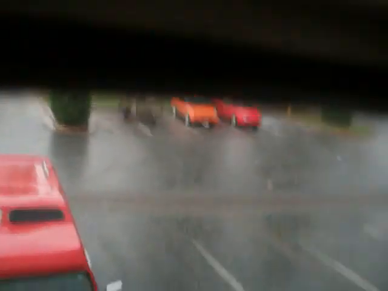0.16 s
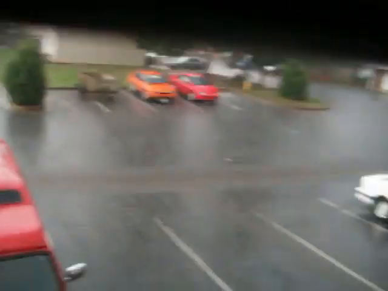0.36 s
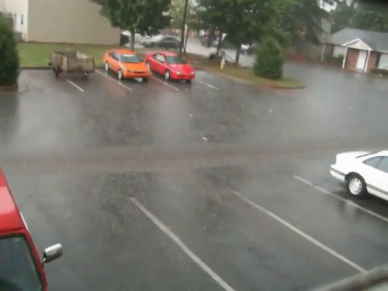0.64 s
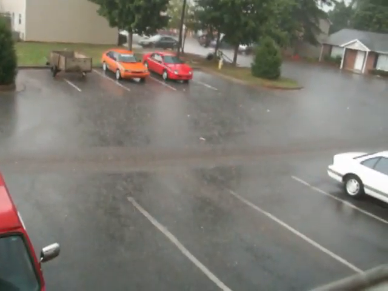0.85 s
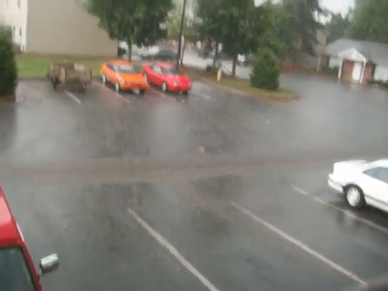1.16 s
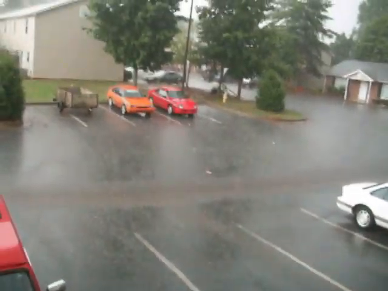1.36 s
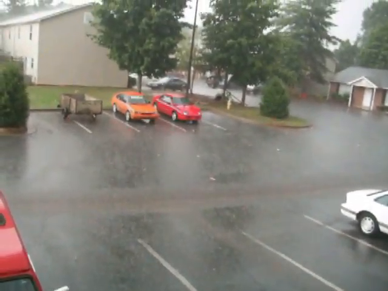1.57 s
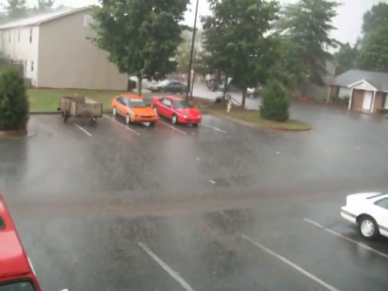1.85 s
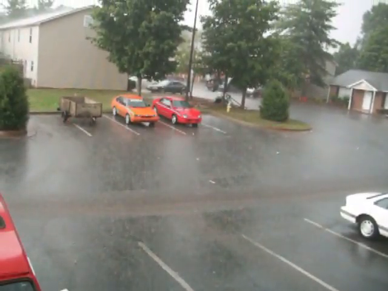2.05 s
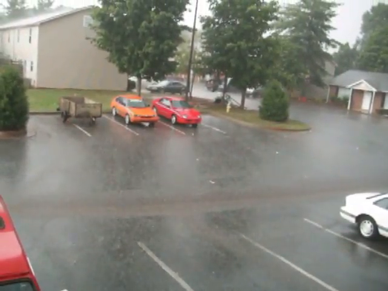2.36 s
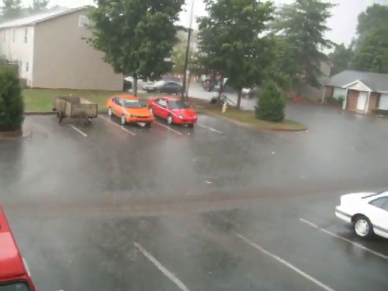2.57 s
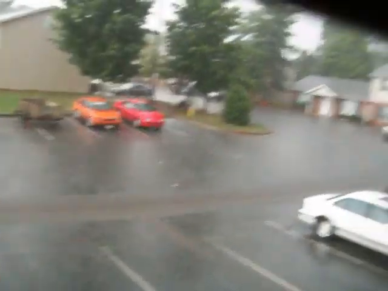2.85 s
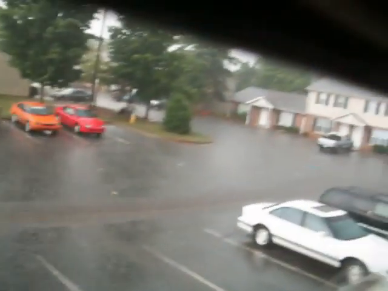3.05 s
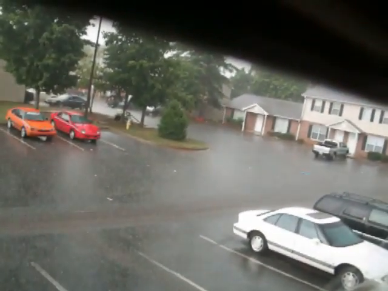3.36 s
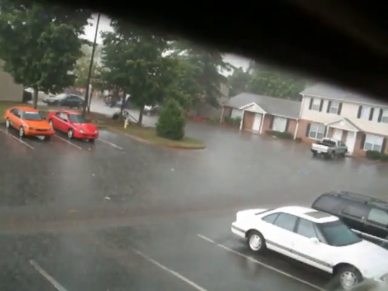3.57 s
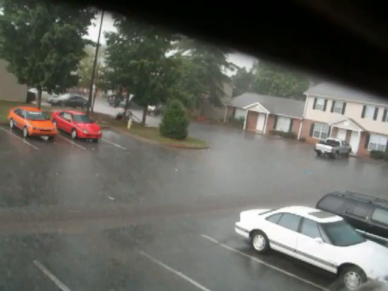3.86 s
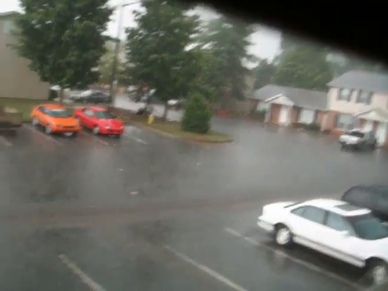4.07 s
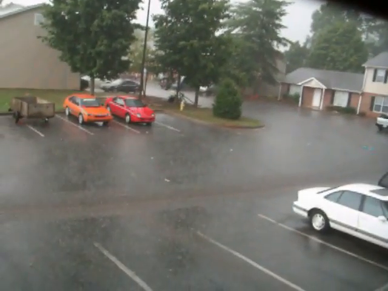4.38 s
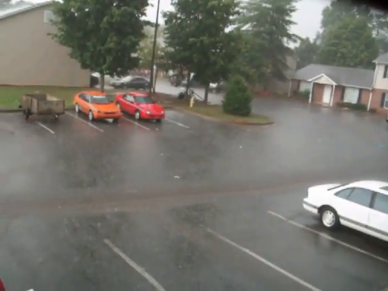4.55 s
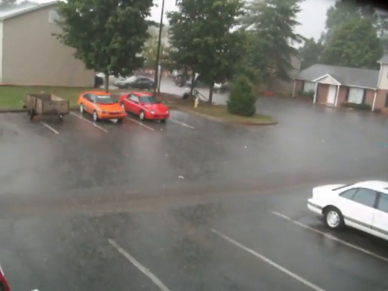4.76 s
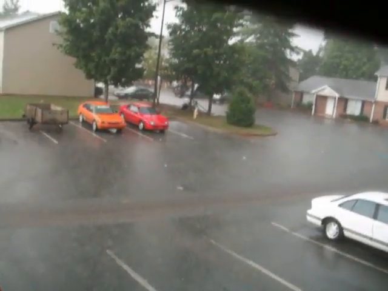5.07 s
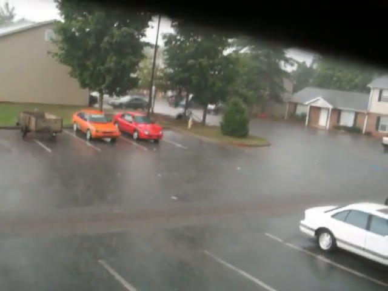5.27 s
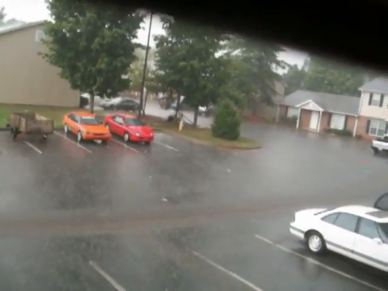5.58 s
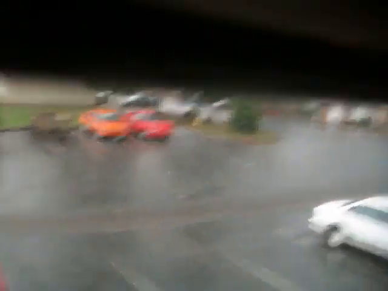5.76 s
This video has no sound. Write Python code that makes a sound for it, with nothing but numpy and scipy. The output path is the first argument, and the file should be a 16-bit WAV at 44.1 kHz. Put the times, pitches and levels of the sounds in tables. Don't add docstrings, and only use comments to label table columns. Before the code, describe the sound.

Heavy rain hisses on pavement and drums on a roof while gusts boom at an open window, with sharp drips and one hard plastic knock.

```python
import sys
import numpy as np
from scipy import signal
from scipy.fft import rfft, irfft
from scipy.io import wavfile
from scipy.ndimage import uniform_filter1d

SR = 44100
rng = np.random.default_rng(int(sys.argv[2]) if len(sys.argv) > 2 else 0)


def master_out(mix):
    frames = np.transpose(np.atleast_2d(mix))
    ceiling = np.clip(frames, -1, 1)
    pcm = np.round(ceiling * 32767).astype(np.int16)
    wavfile.write(sys.argv[1], SR, pcm)


def level_to_linear(level):
    exponent = np.asarray(level, float) / 20
    return 10 ** exponent


N = 261072

# (peak time [s], length [s], push on the microphone port [dB],
# boom of the window opening [dB], rain flung on the roof [dB])
GUSTS = [(0.0, .1, -16.5, -28, -20), (0.155, 0.15, -23, -15, -20), (0.314, 0.24, -21, -17, -17),
         (0.514, 0.23, -30.5, -22, -23.5), (0.719, 0.12, -27, -25, -28), (0.952, 0.19, -29.5, -26, -24.5),
         (1.498, 0.38, -39.5, -30, -28.5), (1.705, 0.3, -29, -32.5, -41), (2.314, 0.28, -31, -29, -27.5),
         (2.662, 0.12, -26, -39, -28.5), (2.93, 0.35, -29, -29, -27), (3.666, .22, -26, -24.5, -25.5),
         (3.873, 0.21, -26, -32, -27), (4.31, 0.24, -27, -34.5, -26.5), (4.53, 0.24, -26.5, -27.5, -28),
         (4.694, 0.094, -31, -33, -25), (4.853, 0.23, -26, -37.5, -30.5), (5.16, .14, -28, -42, -33),
         (5.33, .16, -37, -30.5, -32), (5.547, 0.18, -22.5, -26.5, -28), (5.746, 0.17, -31, -25, -28.5)]
# (frequency [Hz], density [dB per Hz])
WIND_SPECTRUM = [(15, -25.5), (28, -11), (38, 2), (50, 7), (65, 0.5), (85, -3.5), (120, -48.5)]
# (frequency [Hz], density [dB per Hz])
CAVITY_SPECTRUM = [(55, -30.5), (80, -3.5), (108, 5), (130, -2.5), (160, 1), (220, -48)]
# (time [s], level [dB])
DOWNPOUR = [(0, -27), (.17, -29.5), (.42, -28), (.72, -27), (.95, -28), (1.22, -26.5), (2.02, -27.5),
            (2.2, -27), (2.48, -27.5), (2.67, -26), (2.9, -28), (3.55, -28.5), (4.2, -27), (4.55, -27),
            (4.68, -27), (5.42, -27.5), (5.8, -27.5), (5.92, -29)]
# (frequency [Hz], density [dB per Hz])
RAIN_SPECTRUM = [(200, -25.5), (330, 1), (364, -13), (425, -2.5), (600, -4), (820, -3), (1150, -8),
                 (1450, -12), (1800, -16.5), (2150, -14.5), (2900, -18), (3500, -16.5), (4600, -22.5),
                 (6200, -23)]
# (frequency [Hz], density [dB per Hz])
ROOF_SPECTRUM = [(150, -29), (185, 2.5), (235, 3), (300, -8.5), (350, -7), (420, -6.5), (520, -41.5)]
# (start [s], length [s], level [dB], swell from start to end [dB])
RUBS = [
    (0.222, 0.19, -35.5, 2),
    (1.137, .17, -36, 0),
    (2.603, .15, -37.5, -5),
    (5.755, 0.05, -34.5, 1),
]
# (frequency [Hz], density [dB per Hz])
SCRAPE_SPECTRUM = [(2800, -25), (3600, -10), (4050, -2), (4450, 0), (4900, -6), (5500, -16), (6500, -40)]
# (time [s], peak [dB], pitch [Hz])
TICKS = [(.4096, -15, 4800), (.5378, -16, 4800), (.5805, -10.5, 4800), (.6608, -9, 4800),
         (.7904, -10.5, 4400), (1.0512, -2, 4600), (4.089, -14, 4700), (4.3293, -14, 3900),
         (4.6075, -14, 4700), (4.899, -14, 4500), (5.4201, -8.5, 4800), (5.559, -15, 4800),
         (5.589, -15, 4800), (5.7451, -16, 4800)]
# (time [s], peak [dB], pitch [Hz], ring [s])
PLINKS = [
    (0.7526, -13.5, 2300, 0.0071),
    (1.0511, -17, 2800, 0.006),
    (1.1766, -20, 4370, 0.018),
    (2.6179, -18, 3480, 0.013),
    (2.6788, -18, 3140, 0.014),
    (3.0224, -28, 3030, 0.0097),
]
# (time [s], peak [dB], pitch [Hz], ring
# [s])
THUDS = [(0.899, -16, 301, 0.0091), (1.1743, -14, 655, 0.012), (1.176, -12, 400, 0.04),
         (1.758, -18, 390, 0.025), (1.883, -16, 886, 0.0093), (1.984, -5, 516, 0.0048),
         (2.676, -7, 393, 0.0092), (2.681, -10.5, 312, 0.01), (2.697, -17, 676, 0.012),
         (2.702, -9, 317, 0.016), (2.76, -21, 735, 0.012), (3.794, -17, 498, 0.01)]
# (time [s], peak [dB], brightness [dB per octave], mode pitch [factor])
KNOCKS = [
    (1.1739, -19, 0, .97),
    (1.1742, -7, -2.5, 1.0),
    (1.1772, -19, 0, 1.0),
    (2.6453, -11, 3, .97),
    (2.6458, 4, -.4, .99),
    (2.6478, -6, 1.5, 1.03),
]
# (frequency [Hz], level [dB], 60 dB decay [s])
HOUSING = [(399, -7.5, 0.018), (627, 0.5, 0.013), (956, -6.5, .011), (1770, -5.5, 0.014),
           (2300, -10, 0.011), (2850, -8, .012), (3456, -7, 0.014), (4324, -14, 0.013),
           (5160, -13.5, 0.0098)]


def evened(x):
    return x / np.sqrt(np.mean(x ** 2) + 1e-20)


def steadied(x, seconds):
    size = round(seconds * SR)
    power = uniform_filter1d(uniform_filter1d(x ** 2, size=size), size=size)
    return x / np.sqrt(power + 1e-9)


def coloured(x, spectrum):
    hz, db = np.transpose(spectrum)
    bins = np.fft.rfftfreq(len(x), 1 / SR)
    gain = level_to_linear(np.interp(np.log(bins + 1), np.log(hz + 1), db))
    return evened(irfft(rfft(x) * gain, len(x)))


def patchy(patchy_db, flicker_db, size):
    frames = 4 * N // size + 5
    real, imaginary, patches = rng.standard_normal((frames, size // 2 + 1, 3)).T
    patches = uniform_filter1d(patches, size=6, axis=0)
    patches = evened(uniform_filter1d(patches, size=12, axis=1))
    flicker = evened(uniform_filter1d(rng.standard_normal(frames), size=3))
    z = (real + 1j * imaginary) * level_to_linear(patchy_db * patches + flicker_db * flicker)
    return signal.istft(z, nperseg=size, noverlap=3 * size // 4)[1][:N]


def drops(per_s, spread_db):
    size = level_to_linear(spread_db * np.minimum(rng.exponential(1, N), 3.5))
    lands = rng.random(N) < per_s / SR
    return evened(size * lands * rng.choice([-1, 1], N))


def ring(hz, t60):
    t = np.arange(round(0.08 * SR)) / SR
    onset = 1 - np.exp(-t / 0.00025)
    return np.sin(2 * np.pi * hz * t) * level_to_linear(-60 * t / t60) * onset


def add(mix, s, sound):
    part = mix[round(s * SR):][:len(sound)]
    part += sound[:len(part)]


def gusting(column, calm_db):
    rows = np.array(GUSTS)
    t = np.arange(0, N + 256, 256) / SR
    peak_s, length_s = rows[:, :1], rows[:, 1:2]
    bells = np.exp(-4 * np.log(2) * ((t - peak_s) / length_s) ** 2)
    power = level_to_linear(calm_db) ** 2 + level_to_linear(rows[:, column]) ** 2 @ bells
    return np.interp(np.arange(N) / SR, t, np.sqrt(power))


def wind():
    push = steadied(coloured(rng.standard_normal(N), WIND_SPECTRUM), seconds=0.33)
    boom = steadied(coloured(rng.standard_normal(N), CAVITY_SPECTRUM), seconds=0.13)
    gusts = gusting(column=2, calm_db=-34.5) * push + gusting(column=3, calm_db=-33.5) * boom
    dying_buffet = 0.5 * np.exp(-np.arange(N) / SR / 0.0015)
    return level_to_linear(-0.3) * gusts + dying_buffet


def rain():
    puff = level_to_linear(-60 * np.arange(600) / SR / 0.0084)
    puffs = signal.oaconvolve(abs(drops(per_s=900, spread_db=2)), puff)[:N]
    near = evened(puffs * rng.standard_normal(N))
    far = evened(patchy(patchy_db=0.5, flicker_db=0.5, size=512))
    s, db = np.transpose(DOWNPOUR)
    strength = level_to_linear(np.interp(np.arange(N) / SR, s, db) + 2.0)
    return strength * coloured(far + level_to_linear(-4.5) * near, RAIN_SPECTRUM)


def roof():
    drive = drops(per_s=620, spread_db=3.5) + level_to_linear(2.5) * rng.standard_normal(N)
    drumming = steadied(coloured(drive, ROOF_SPECTRUM), seconds=0.15)
    return gusting(column=4, calm_db=-29) * level_to_linear(-0.5) * drumming


def strokes():
    edge_s = 0.024
    t, out = np.arange(N) / SR, np.zeros(N)
    for start, length, db, swell_db in RUBS:
        inside = np.minimum(t - start, start + length - t)
        edges = np.clip(inside / edge_s + 0.5, 0, 1)
        along = np.clip((t - start) / length, 0, 1)
        out += edges ** 2 * level_to_linear(db + swell_db * (along - 0.5))
    return out


def scrape():
    hiss = patchy(patchy_db=-1.5, flicker_db=0.5, size=256)
    return strokes() * coloured(hiss, SCRAPE_SPECTRUM)


def drips():
    tick_ring_s = 0.0026
    ticks = [(*tick, tick_ring_s) for tick in TICKS]
    out = np.zeros(N)
    for s, db, hz, t60 in [*ticks, *PLINKS, *THUDS]:
        overtone = 0.7 * ring(1.21 * hz, 0.8 * t60)
        add(out, s, level_to_linear(db) * (ring(hz, t60) + overtone))
    return out


def knocks():
    out = np.zeros(N)
    for s, db, tilt_db, pitch in KNOCKS:
        body = 0
        for hz, mode_db, t60 in HOUSING:
            level_db = mode_db + tilt_db * np.log2(hz / 640)
            body = body + level_to_linear(level_db) * ring(hz * pitch, t60)
        add(out, s, level_to_linear(db) * body / abs(body).max())
    return out


def scene():
    return (wind() + rain() + roof() + scrape() + drips() + knocks())[None]


def top_cut(x):
    return signal.sosfilt(signal.butter(12, 17200, fs=SR, output="sos"), x)


def record(dry):
    step, first = 4, 2
    levels, offset = 128, 0.0336
    running = np.pad(dry, ((0, 0), (32, 32)), "edge")
    held = np.zeros(running.shape)
    sampled = np.round((running[:, first::step] + offset) * levels) / levels
    held[:, first::step] = np.clip(sampled, -1, 1)
    smooth = step * signal.firwin(65, 1 / step, window=("kaiser", 9))
    mix = np.clip(signal.oaconvolve(held, smooth[None], "valid"), -1, 1)
    return top_cut(mix)


dry = scene()
out = record(dry)
master_out(out)
```